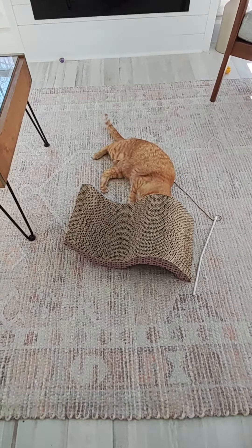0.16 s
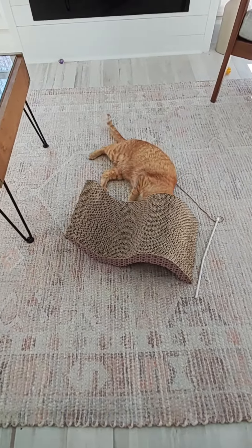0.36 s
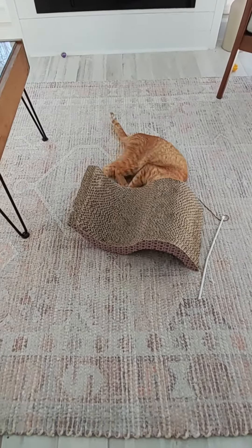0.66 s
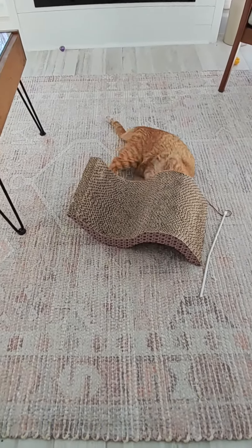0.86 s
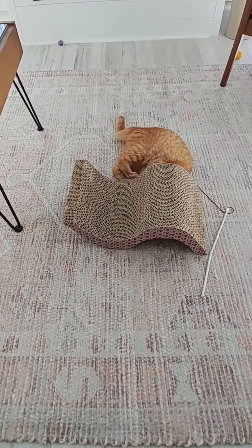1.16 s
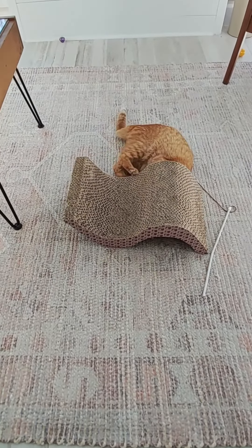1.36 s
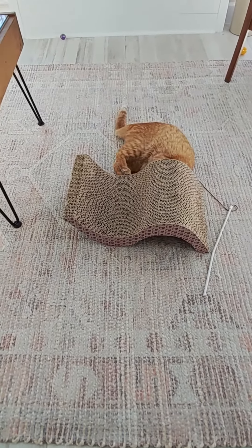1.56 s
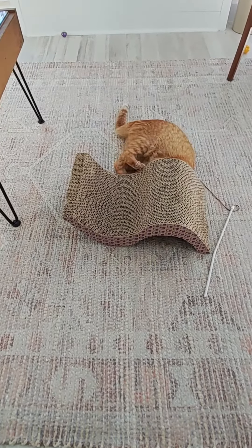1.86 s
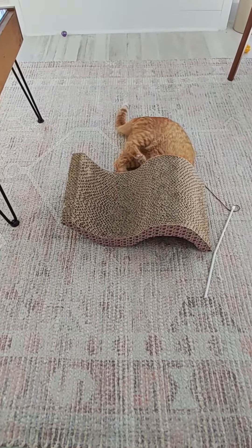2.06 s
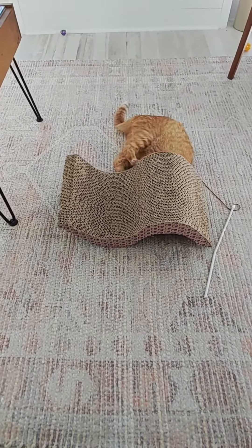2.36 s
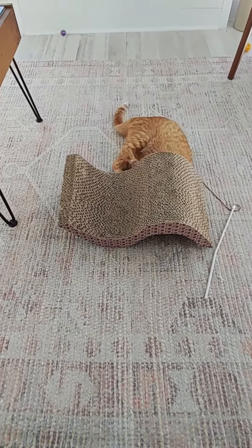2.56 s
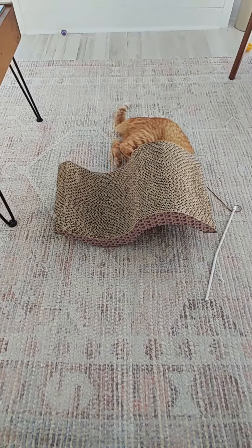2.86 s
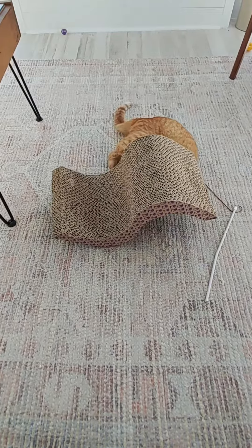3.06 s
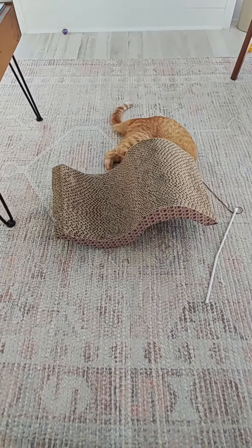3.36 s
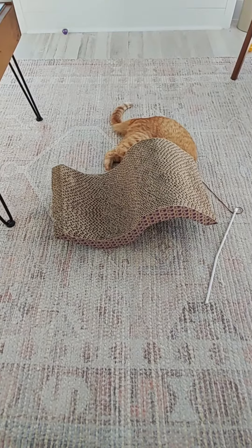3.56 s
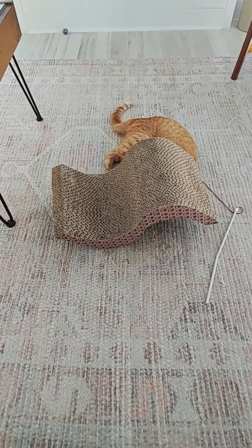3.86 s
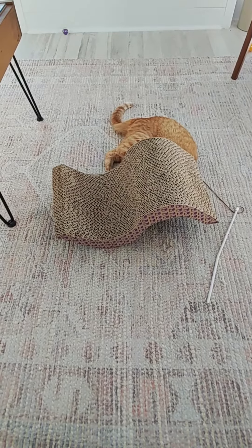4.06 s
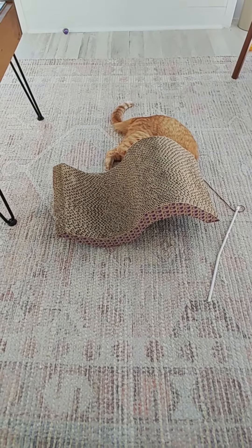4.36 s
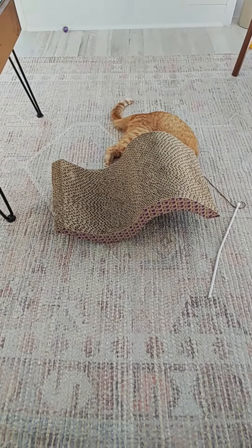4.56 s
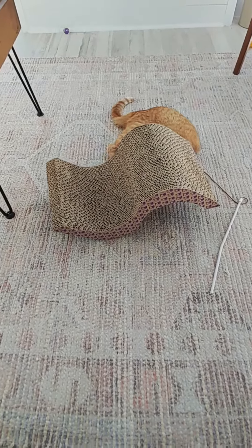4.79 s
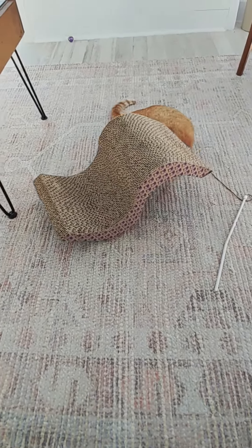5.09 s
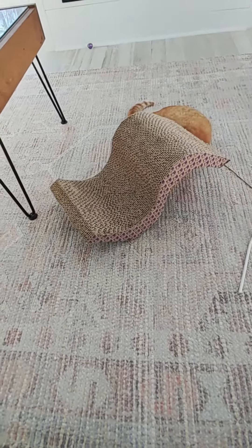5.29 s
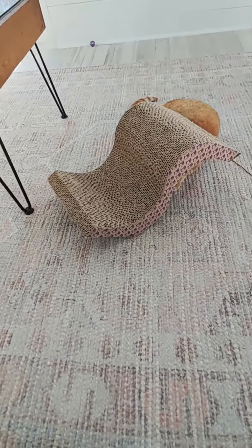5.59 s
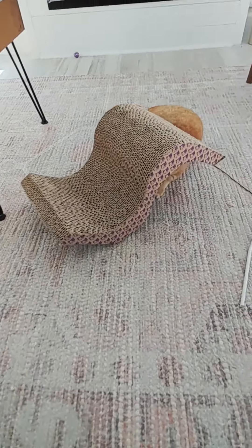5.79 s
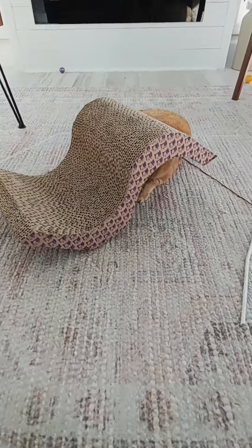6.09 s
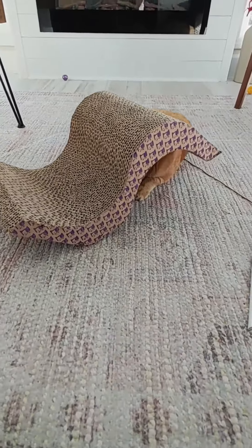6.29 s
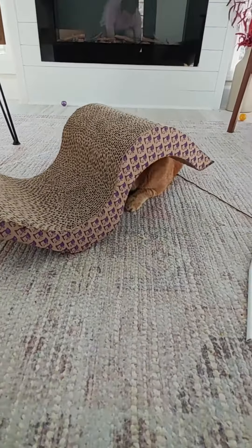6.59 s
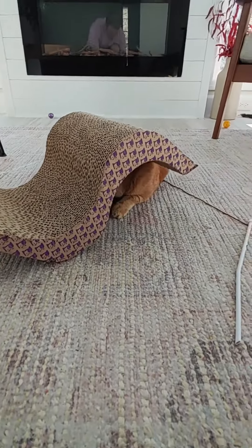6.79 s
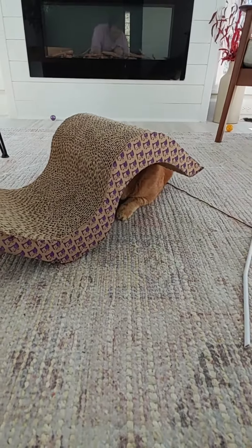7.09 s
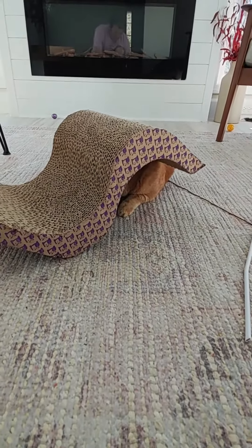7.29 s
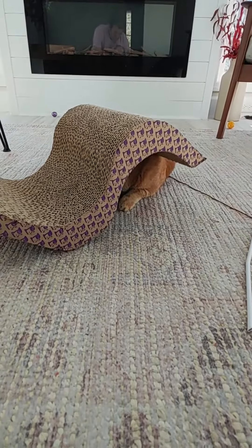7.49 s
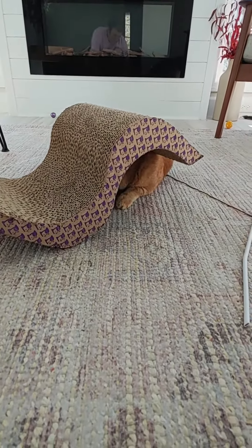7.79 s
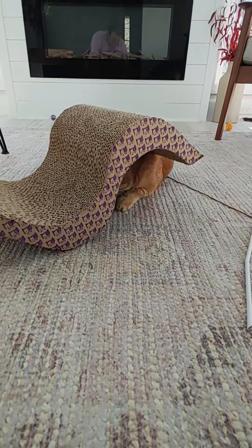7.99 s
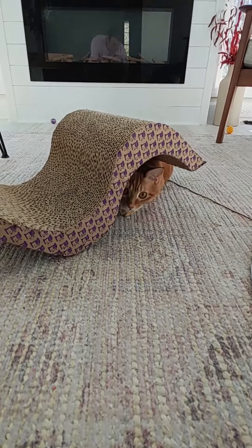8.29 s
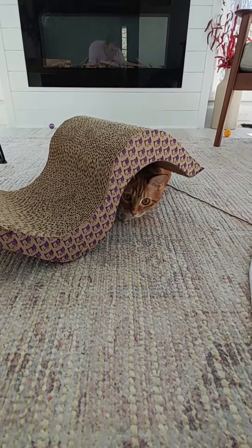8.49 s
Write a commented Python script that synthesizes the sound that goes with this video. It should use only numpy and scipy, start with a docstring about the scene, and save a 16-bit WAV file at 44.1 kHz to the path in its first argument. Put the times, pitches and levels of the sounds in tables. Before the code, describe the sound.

Dry cardboard scraping with sharp cracks comes in uneven bursts, nearly stops, then hollow close-up thuds of a hand shifting the phone take over.

```python
"""A cat shoves and claws a corrugated cardboard scratcher over a woven rug in a quiet living room.
Strokes of dense random grains rasp and hiss, with short fading bursts of resonant noise and sharp snaps.
A moving hand holds the listening phone: rubs and knocks on its case, close and dry, ring
a hollow resonance near 520 Hz. Faint high ticks, one tap further off and a soft room tone complete it."""
import sys
import numpy as np
from scipy import signal
from scipy.fft import rfft, irfft
from scipy.io import wavfile

SR = 44100
rng = np.random.default_rng(int(sys.argv[2]) if len(sys.argv) > 2 else 0)


def dump_mix(stems):
    """Bounce the given channels to the path in sys.argv[1] as a 16-bit WAV at rate SR."""
    frames = np.atleast_2d(stems).T  # one column per channel
    limited = np.clip(frames, -1, 1)  # hard clip at full scale
    pcm = np.round(limited * 32767).astype(np.int16)
    wavfile.write(sys.argv[1], SR, pcm)


N = 381465
TIME = np.arange(N) / SR


def undb(db):
    """Turn decibels into a gain."""
    return 10 ** (np.asarray(db) / 20)


def unit(x):
    """Scale to rms 1."""
    return x / np.sqrt(np.mean(x ** 2))


def unit_peak(x):
    """Scale so that the envelope tops at 1."""
    return x / np.abs(signal.hilbert(x, 2 * len(x))).max()


def response(points, size=4096):
    """An impulse response with the given spectrum, with its energy as early as possible."""
    hz, db = np.transpose(points)
    f = np.maximum(np.fft.rfftfreq(size, 1 / SR), 1)
    spectrum_db = np.interp(np.log(f), np.log(hz), db)
    # folding the cepstrum forward in time makes the response causal
    cepstrum = irfft(np.log(undb(spectrum_db)))
    cepstrum[1:size // 2] *= 2
    cepstrum[size // 2 + 1:] = 0
    return irfft(np.exp(rfft(cepstrum)))


def through(x, ring):
    """Play x through an impulse response."""
    return signal.fftconvolve(x, ring)[:N]


def resonate(x, hz, q):
    """A resonance with steep skirts, from one peak filter used twice; rms 1."""
    peak = signal.iirpeak(hz, q, fs=SR)
    once = signal.lfilter(*peak, x)
    return unit(signal.lfilter(*peak, once))


def walk(rate):
    """A random wander joining `rate` random points per second by straight lines; rms 1."""
    knots = rng.standard_normal(int(N / SR * rate) + 2)
    return unit(np.interp(TIME * rate, np.arange(len(knots)), knots))


def glide(x, speed):
    """Bend the pitch of x by a changing factor."""
    return np.interp(np.cumsum(speed), np.arange(len(x)), x)


def grains(rate, spread_db):
    """Tiny slips at random times, `rate` per second on average, most weak and a few strong; rms 1."""
    size = undb(spread_db * np.minimum(rng.exponential(size=N), 5))
    happens = rng.random(N) < rate / SR
    return unit(happens * size * rng.standard_normal(N))


def fade(t60, size=4096):
    """Exponential decay that falls 60 dB in t60 seconds."""
    return np.exp(-np.log(1000) * TIME[:size] / t60)


def burst(points, t60, crumble, size=4096):
    """A sharp impulse and a fading noisy tail, coloured by a spectrum; peak 1."""
    push = crumble * rng.standard_normal(size) * fade(t60, size=size)
    push[0] = 1
    return unit_peak(signal.fftconvolve(push, response(points))[:size])


def add(track, s, sound):
    """Mix a sound in at time s."""
    i = max(int(s * SR), 0)
    track[i:i + len(sound)] += sound[:N - i]


def gesture(start, rise, hold, sag_db_per_s, release_db_per_s):
    """Gain of one movement: it swells, sags while held and dies away."""
    age = TIME - start
    swell = np.clip(age / rise, 0, 1)
    sag_db = sag_db_per_s * np.clip(age - rise, 0, hold)
    release_db = release_db_per_s * np.maximum(age - rise - hold, 0)
    return swell * undb(-sag_db - release_db)


# claws catching on the flutes: average rate, fall time in seconds, how deep the level moves
CATCHES_PER_S, CATCH_T60_S, CATCH_DEPTH = 95, .016, .82


def catching():
    """Claws catch on flute after flute at uneven gaps: each catch jumps the level and lets it fall; rms 1."""
    jerks = np.zeros(N)
    gaps, sizes = rng.gamma(2, 1 / 2, (int(2 * CATCHES_PER_S * N / SR), 2)).T
    at = (np.cumsum(gaps) / CATCHES_PER_S * SR).astype(int)
    jerks[at[at < N]] = np.minimum(sizes[at < N], 2.5)
    falls = through(jerks, fade(CATCH_T60_S))
    return unit(1 - CATCH_DEPTH / 2 + CATCH_DEPTH * falls)


def cell_ring(slips, t60, rate, count=14):
    """The many cells of the board smear each slip; which of them ring changes as the contact moves."""
    rings = rng.standard_normal((count, len(fade(t60)))) * fade(t60)
    weights = np.array([walk(rate) for _ in rings])
    weights /= np.linalg.norm(weights, axis=0)
    return sum(w * through(slips, ring) for w, ring in zip(weights, rings))


# Strokes of card over claws and rug. Each row: start, rise and hold in seconds, then levels in dB
# (before the overall trims below) of the hollow board, the rasp of the flutes, the hiss of the rug fibres.
STROKES = [(-.03, 0.14, .03, -57, -55, -49.5), (0.222, 0.034, 0.18, -52, -53.5, -49.5),
           (0.485, 0.091, 0.1, -48.5, -47.5, -43), (0.643, .02, 0.078, -52, -50, -47),
           (0.993, 0.003, 0.11, -43, -47, -53), (1.047, 0.006, 0.026, -38.5, -40, -44),
           (1.127, 0.021, 0.067, -47, -48.5, -52), (1.413, 0.015, 0.097, -57, -61.5, -68),
           (1.666, 0.031, 0.14, -66.5, -67, -63.5), (1.806, 0.02, 0.069, -52, -59, -58),
           (1.894, 0.074, 0.18, -52.5, -59.5, -53), (2.087, 0.061, 0.011, -47.5, -49, -46),
           (2.191, 0.1, 0.07, -48, -49.5, -72), (2.508, 0.096, 0.17, -55, -57, -57.5),
           (2.686, 0.0036, 0.081, -41, -47, -48.5), (2.828, 0.012, 0.11, -56, -57.5, -54.5),
           (3.004, 0.046, 0.14, -67.5, -68, -55.5), (3.247, 0.14, 0.084, -80, -69, -62.5),
           (4.58, 0.14, 0.17, -74, -73, -62.5), (4.844, 0.029, 0.2, -62, -58, -52),
           (5.052, 0.059, 0.0034, -48.5, -52, -54), (5.18, 0.073, 0.051, -61, -59.5, -55),
           (5.704, 0.15, 0.028, -52.5, -51, -52.5), (7.98, 0.16, 0.25, -75.5, -71, -67)]
# Tone colours of board, rasp and fibres. Each row: frequency in Hz, relative level in dB per Hz.
BOARD = [(335, -24), (382, 3.5), (420, -6), (480, -3), (630, -7), (820, -.5), (1150, -.5), (1650, -5),
         (2100, -12), (4200, -22)]
RASP = [(1000, -7), (2000, -2.5), (3700, 2), (5700, -1), (7500, -12), (11000, -32)]
FIBRES = [(5000, -7.5), (7800, -8), (9500, -2.5), (12500, -5), (15500, -11)]
# a stroke loses force while it is held, then dies away fast
STROKE_SAG_DB_PER_S, STROKE_RELEASE_DB_PER_S = 21, 201


def scraping(board_db=-1, rasp_db=-2.0, hiss_db=-5):
    """Card slips over flutes and rug fibres in dense grains, catch after catch; the hollow board colours it."""
    power = np.zeros((3, N))
    for start, rise, hold, *levels in STROKES:
        force = gesture(start, rise, hold, STROKE_SAG_DB_PER_S, STROKE_RELEASE_DB_PER_S)
        power += (undb(levels)[:, None] * force) ** 2
    board, rasp, hiss = np.sqrt(power)
    catches = catching()
    slips = grains(rate=9000, spread_db=2.0)
    fibres = grains(rate=23000, spread_db=3.0) * undb(0.5 * walk(90))
    cells = cell_ring(slips, t60=.02, rate=14)
    hollow_sound = unit(through(cells * catches, response(BOARD)))
    rasp_sound = unit(through(slips * catches, response(RASP)))
    hiss_sound = unit(through(fibres, response(FIBRES)))
    return (undb(board_db) * board * hollow_sound
            + undb(rasp_db) * rasp * rasp_sound
            + undb(hiss_db) * hiss * hiss_sound)


# Ringing modes of the phone case. Each row: frequency in Hz, relative level in dB,
# time to fall 60 dB in seconds; all as they are before detuning, damping and the upper-mode change.
CASE = [(522.3, 5, 0.04), (670, 7, 0.014), (866, -1, 0.0016), (1437, -26.5, 0.05)]


def case_ring(detune, damping, upper_db):
    """The case rings in modes of alternating sign; where it is struck sets the upper modes; peak 1."""
    ring = 0
    for k, (hz, db, t60) in enumerate(CASE):
        decay = fade(t60 / damping)
        level = (-1) ** k * undb(db + upper_db * (k > 0))
        ring = ring + level * decay * np.sin(2 * np.pi * hz * detune * TIME[:len(decay)])
    return unit_peak(ring)


# Rubs on the case, and a brief rattle after a hard knock. Each row: start, rise and hold in seconds,
# level in dB before the part trims.
RUBS = [(-.03, 0.022, 0.27, -50.5), (4.925, 0.039, 0.2, -49.5), (5.265, 0.06, 0.13, -47),
        (5.943, 0.033, 0.04, -48.5), (6.584, 0.0072, 0.011, -41)]
# The moving hand shakes the microphone. Each row: time in seconds, level in dB.
SWAY = [(0, -60.5), (.12, -46.5), (.5, -44.5), (.62, -58), (.86, -46.5), (1.15, -41), (1.3, -55),
        (1.8, -51.5), (2.2, -45), (2.6, -57), (2.9, -42.5), (3.15, -51.5), (4.0, -56), (5.0, -48.5),
        (6.2, -44.5), (7.0, -43.5), (7.25, -50), (8.65, -55)]
# Tone colours of contact click, dull thump and hand rumble. Each row: frequency in Hz, relative dB per Hz.
CLICK = [(500, -19), (1300, 4), (2000, -4), (3100, -8.5), (4200, -19.5), (6000, -19.5), (16000, -48.5)]
THUMP = [(20, -28), (55, 9.5), (140, 2), (500, -9), (1200, -33), (4000, -119)]
RUMBLE = [(10, -6), (28, 0.5), (45, -23), (80, -18.5), (300, -42.5), (1000, -50.5)]
# pitch wander of the ringing case: typical share, random points per second
RUB_WANDER, RUB_WANDER_PER_S = .07, 12
RUB_RELEASE_DB_PER_S = 400


def rubs_and_sway(rub_db=-1, stutter_db=-5, grit_db=-13):
    """Random slips ring the case at a wandering pitch, scrape and stutter; the moving hand rumbles."""
    slips = grains(rate=2200, spread_db=1.5)
    case = unit(through(slips, case_ring(1, 1.5, 0)))
    grit = unit(through(slips, response(CLICK)))
    case = glide(case, 1 + RUB_WANDER * walk(RUB_WANDER_PER_S))
    stutter = unit(through(grains(rate=95.0, spread_db=1.5), response(THUMP)))
    strength = sum(undb(db) * gesture(start, rise, hold, 0, RUB_RELEASE_DB_PER_S)
                   for start, rise, hold, db in RUBS)
    rub = strength * (undb(rub_db) * case + undb(grit_db) * grit + undb(stutter_db) * stutter)
    rumble = unit(through(rng.standard_normal(N), response(RUMBLE)))
    sway = undb(np.interp(TIME, *np.transpose(SWAY))) * rumble
    return rub + sway


# Colour of the steady room tone. Each row: frequency in Hz, relative level in dB per Hz.
ROOM_TONE = [(20, 2), (100, -5.5), (170, -12), (600, -22.5), (2000, -31), (6000, -31.5), (10000, -38),
             (15500, -35)]
ROOM_TONE_DB = -58.5


def room_tone():
    """The quiet room is steady noise, strongest in the bass."""
    return undb(ROOM_TONE_DB) * unit(through(rng.standard_normal(N), response(ROOM_TONE)))


def dull_thump():
    """A low impulse with a faint noisy tail; peak 1."""
    return burst(THUMP, t60=0.071, crumble=0.041)


# Fingers knocking on the phone. Each row: start in seconds, case ring in dB, thump and click in dB
# (before their trims), change of the upper case modes in dB.
KNOCKS = [(0.111, -28, -34, -22, 9.5), (0.219, -28.5, -33, -53, -2), (0.227, -23.5, -30.5, -26, -4.5),
          (0.508, -32.5, -27.5, -35, -1.5), (0.748, -25.5, -53, -47, -5.5), (1.139, -19, -23, -49, -12),
          (4.561, -29.5, -26, -34, 6), (4.839, -26.5, -27, -46, 26), (5.1605, -30, -39, -34, 20),
          (5.237, -39.5, -37, -55, 12), (5.314, -41, -36, -51, -5), (5.477, -31, -29, -65, -1),
          (5.5161, -34.5, -26.5, -37.5, 5), (5.546, -21.5, -25, -21, 5.5), (5.7285, -16, -37, -60, 0),
          (5.816, -26, -45, -44, -1), (5.849, -25, -36.5, -55, -2), (5.909, -32, -37, -35, 14),
          (5.9578, -26, -35, -42, -4), (6.021, -31.5, -31, -45, -5), (6.0403, -17.5, -36, -66, -1),
          (6.0613, -27.5, -27.5, -51, 3), (6.0798, -20.5, -34, -37.5, -1.5), (6.164, -12, -24.5, -28, 0.5),
          (6.3059, -12.5, -24, -32.5, 2.5), (6.5812, -7, -22, -25, 1.5), (6.817, -31.5, -41, -41, 12),
          (6.832, -36, -43, -39, 8), (6.8519, -11, -23, -22, 1.5), (7.0193, -11.5, -23, -20.5, -1)]
# a knock that rings harder than this rebounds and touches again
HARD_KNOCK_DB = -14.5
# second touch: delay in seconds, then ring and contact in dB relative to the first touch
REBOUND_S, REBOUND_RING_DB, REBOUND_CONTACT_DB = .0122, -15.5, -33.5
# woody clack of that second touch; level relative to the knock's ring
CLACK_HZ, CLACK_Q, CLACK_T60_S, CLACK_DB = 1700, 2.4, .016, -29


def knocks(thump_db=2, click_db=-1, creak_db=-40, creak_hz=1450, creak_q=1.58, creak_t60=0.14, size=4096):
    """A knock pushes, rings and clicks the case; hard ones rebound with a clack; it creaks as it settles."""
    out, settling = np.zeros(N), np.zeros(N)
    variations = rng.standard_normal((len(KNOCKS), 2))
    for (s, ring, thump, click, upper), (tune, grip) in zip(KNOCKS, variations):
        # each knock varies a little in pitch and in how firmly the grip damps it
        ringing = undb(ring) * case_ring(1 + 0.013 * tune, np.exp(0.06 * grip), upper)
        contact = -undb(thump + thump_db) * dull_thump()
        add(out, s, ringing + contact)
        add(out, s + 0.00074, -undb(click + click_db) * burst(CLICK, t60=0.0088, crumble=0.24))
        if ring > HARD_KNOCK_DB:
            noise = rng.standard_normal(size) * fade(CLACK_T60_S, size=size)
            clack = undb(ring + CLACK_DB) * unit_peak(resonate(noise, CLACK_HZ, CLACK_Q))
            second_touch = undb(REBOUND_RING_DB) * ringing + undb(REBOUND_CONTACT_DB) * contact
            add(out, s + REBOUND_S, second_touch + clack)
        add(settling, s, undb(ring + creak_db) * fade(creak_t60))
    slips = grains(rate=900, spread_db=.5)
    return out + settling * resonate(slips, creak_hz, creak_q)


# Sharp snaps and clicks, most from the board, a few close on the phone.
# Each row: start in seconds, low knock and bright crack in dB before their trims.
SNAPS = [(0.1115, -50, -36), (0.6702, -23.5, -34), (0.7013, -21, -46), (0.8949, -31.5, -41),
         (1.001, -24.5, -48), (1.0535, -18, -15), (1.0695, -27, -27), (1.1377, -21, -21),
         (2.1459, -20, -34), (2.2281, -26.5, -60), (2.6835, -27, -41), (2.695, -24, -48), (2.776, -26, -40),
         (2.8421, -26, -39), (3.144, -31, -33.5), (4.866, -32, -34), (5.5472, -60, -22.5)]
# Claws plucking rug fibres, a thin high snick. Each row: start in seconds, peak level in dB.
PLUCKS = [(0.316, -31), (0.6535, -25.5), (2.1559, -20), (3.1438, -28.5), (4.9052, -24)]
# Colour of the crack. Each row: frequency in Hz, relative level in dB per Hz.
CRACK = [(300, -30), (1000, 15), (2100, 9), (3100, 10.5), (5500, 14), (8000, 7.5), (12000, -15),
         (16000, -49)]


def snaps_and_plucks(knock_db=-1, crack_db=1, pluck_t60=0.0085):
    """Each snap is a bright crack and a short knock in the board's colour; a plucked fibre only snicks."""
    out = np.zeros(N)
    for s, knock, crack in SNAPS:
        add(out, s, undb(knock + knock_db) * burst(BOARD, t60=0.067, crumble=0.069))
        add(out, s, undb(crack + crack_db) * burst(CRACK, t60=.005, crumble=.4))
    for s, db in PLUCKS:
        # the difference between neighbouring samples thins the sound
        snick = np.diff(burst(FIBRES, t60=pluck_t60, crumble=0.3))
        add(out, s, undb(db) * unit_peak(snick))
    return out


# Short fading bursts of resonant noise: low booms, hollow rubs and high rustles. Each row: start in seconds,
# level in dB, time to fall 60 dB in seconds, resonance in Hz at the start.
RESONANT_BURSTS = [(0.115, -43, 0.24, 1480), (0.667, -36.5, 0.37, 1350), (0.667, -45.5, 0.8, 514),
                   (.747, -35.5, 0.24, 493), (.776, -35, 0.17, 438), (0.776, -52.5, 0.16, 217),
                   (0.894, -46, 0.24, 530), (1.058, -34.5, 0.16, 1790), (1.238, -43, 0.083, 3860),
                   (1.361, -47, 0.38, 1100), (1.822, -54, 0.31, 1200), (1.94, -50.5, 0.31, 1220),
                   (2.152, -40.5, 0.43, 503), (2.684, -38.5, 0.22, 408), (2.694, -33.5, 0.065, 870),
                   (2.735, -43, 0.17, 3100), (2.84, -49.5, 0.29, 400), (2.84, -49.5, 0.29, 940),
                   (3.144, -49.5, 0.14, 3740), (5.84, -49.5, 0.31, 6200)]
# the pitch sinks exponentially; at first it loses this share per second
SINK_PER_S = .8


def resonant_bursts(q=2.04, size=16384):
    """Each burst starts abruptly and dies away: random grains ring one resonance that sinks in pitch."""
    out = np.zeros(N)
    sinking = np.exp(-SINK_PER_S * TIME[:size])
    for s, db, t60, hz in RESONANT_BURSTS:
        slips = grains(rate=3000, spread_db=1.5)[:size]
        ring = glide(resonate(slips, hz, q), sinking)
        add(out, s, undb(db) * ring * fade(t60, size=size))
    return out


# Dull soft thumps without ring, some under board snaps. Each row: start in seconds, peak level in dB.
SOFT_THUMPS = [(0.29, -38), (0.354, -37), (0.392, -36.5), (1.053, -31.5), (1.079, -29), (1.794, -46),
               (1.955, -39.5), (2.147, -35), (2.261, -36), (4.771, -38.5), (6.354, -43), (6.6224, -33)]


def soft_thumps():
    """Dull soft thumps, each a low impulse without ring."""
    out = np.zeros(N)
    for s, db in SOFT_THUMPS:
        add(out, s, undb(db) * dull_thump())
    return out


# Faint high ticks: a plain list of starts in seconds.
TICKS = [1.536, 1.638, 1.74, 3.204, 3.3, 3.378, 3.443, 4.319, 5.431, 5.485, 5.599, 6.898, 6.963, 7.065,
         7.113, 7.3, 7.397, 7.489, 8.159, 8.305]
TICK_PAIR_S = .017


def faint_ticks(tick_db=-46):
    """Tiny high ticks of fading treble noise, each with a copy of random lower level close behind."""
    out = np.zeros(N)
    treble = signal.butter(2, [5400, 9500], "band", fs=SR, output="sos")
    for s in TICKS:
        noise = rng.standard_normal(len(fade(1))) * fade(.008)
        tick = undb(tick_db) * unit_peak(signal.sosfilt(treble, noise))
        add(out, s, tick)
        add(out, s + TICK_PAIR_S, rng.random() * tick)
    return out


# Ring of a light hard object touched further off. Each row: frequency in Hz, relative level in dB per Hz.
FAR_RING = [(500, -10), (1000, -4), (1600, -12), (2130, 2), (2700, -10.5), (5200, -6), (11000, -22.5)]
FAR_TAP_S, FAR_TAP_DB = 7.5335, -32


def far_tap(size=16384):
    """A small tap further off, with a long noisy tail like room sound."""
    out = np.zeros(N)
    add(out, FAR_TAP_S, undb(FAR_TAP_DB) * burst(FAR_RING, t60=.36, crumble=.05, size=size))
    return out


def room(x, t60=0.66, wet_db=-9, echo_s=0.0087, echo_db=-14, size=16384):
    """One near reflection and a short furnished-room tail of fading noise."""
    tail = rng.standard_normal(size) * fade(t60, size=size) * (TIME[:size] > echo_s)
    tail *= undb(wet_db) / np.linalg.norm(tail)
    add(tail, echo_s, undb([echo_db]))
    return x + through(x, tail)


def scene():
    """Strokes, bursts and snaps with room sound, dry knocks, thumps and rubs, over the room tone."""
    tone = room_tone()
    board = room(scraping() + resonant_bursts())
    snaps = room(snaps_and_plucks(), wet_db=-16.0, echo_db=-25)
    tap = far_tap()
    close = knocks() + soft_thumps() + rubs_and_sway()
    return (board + snaps + tap + close + faint_ticks() + tone)[None]


TOP_HZ = 15900


def record(dry, port_hz=9600, port_q=6, port_db=4):
    """The microphone port resonates in the treble; a steep filter cuts the top."""
    port = signal.lfilter(*signal.iirpeak(port_hz, port_q, fs=SR), dry)
    top_cut = signal.ellip(8, .2, 70, TOP_HZ, fs=SR, output="sos")
    return signal.sosfilt(top_cut, dry + undb(port_db) * port)


dry = scene()
out = record(dry)
dump_mix(out)
```